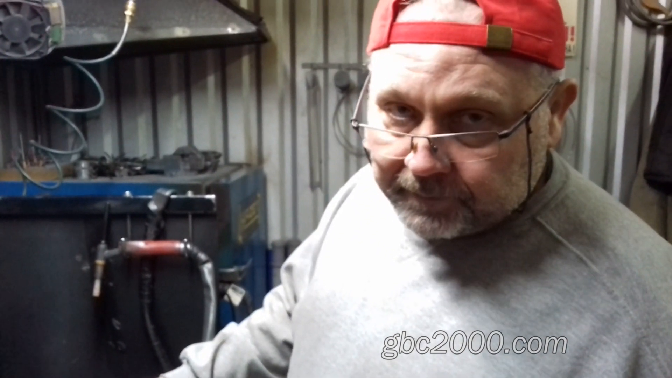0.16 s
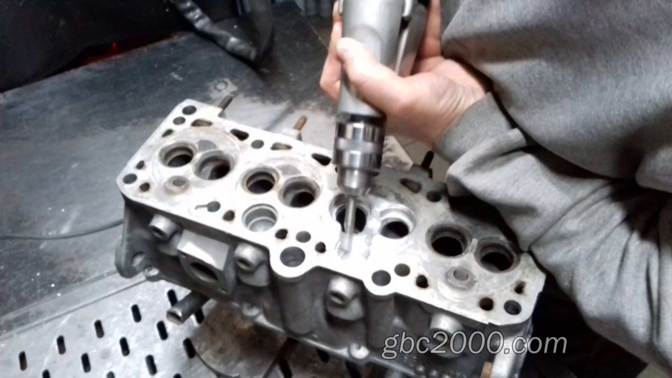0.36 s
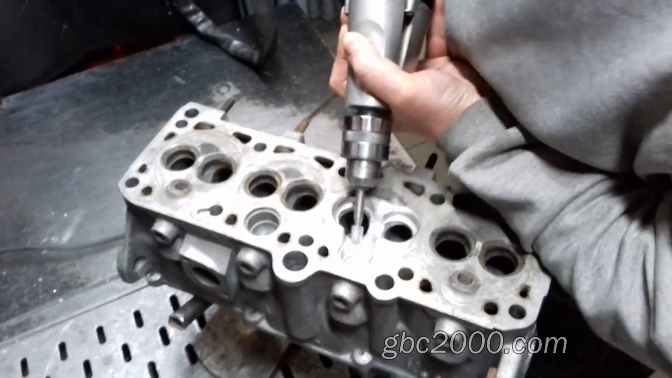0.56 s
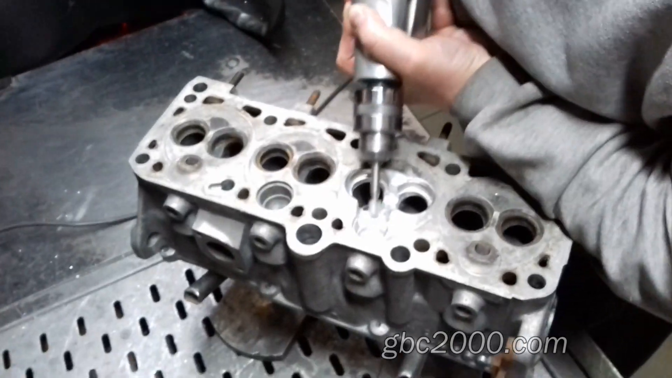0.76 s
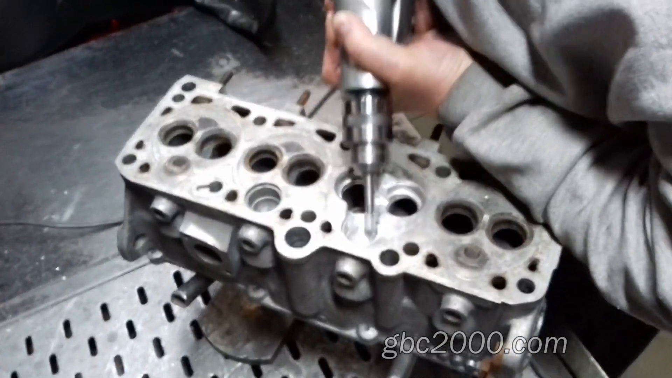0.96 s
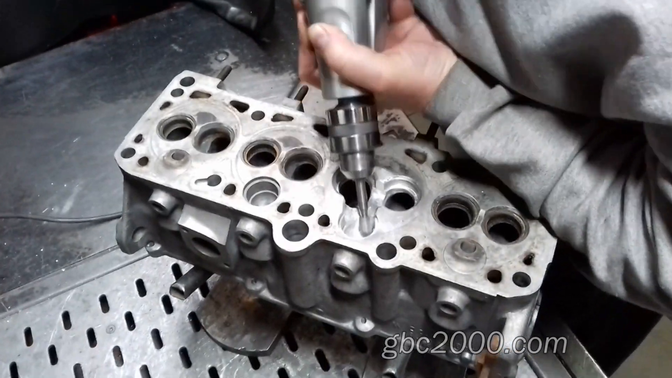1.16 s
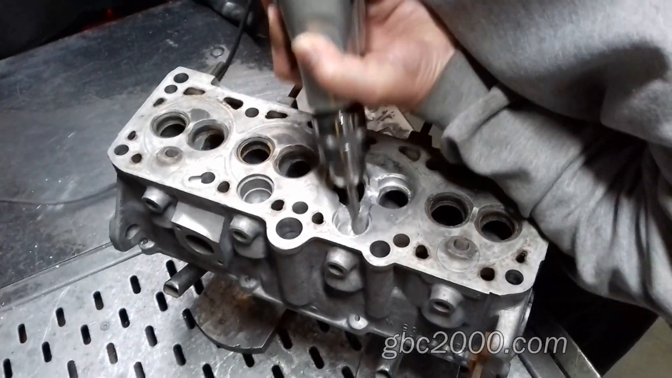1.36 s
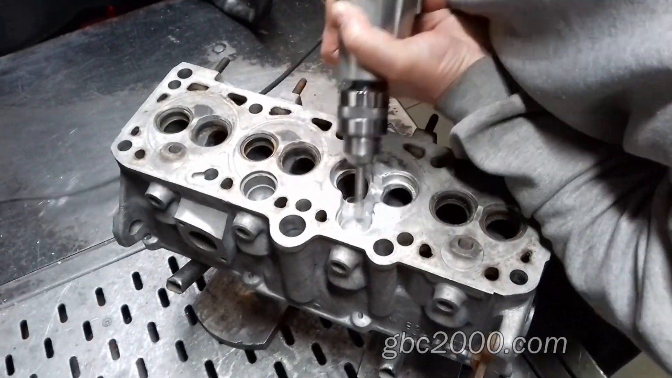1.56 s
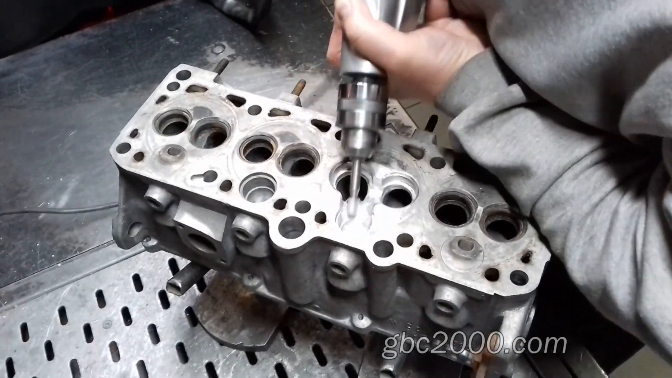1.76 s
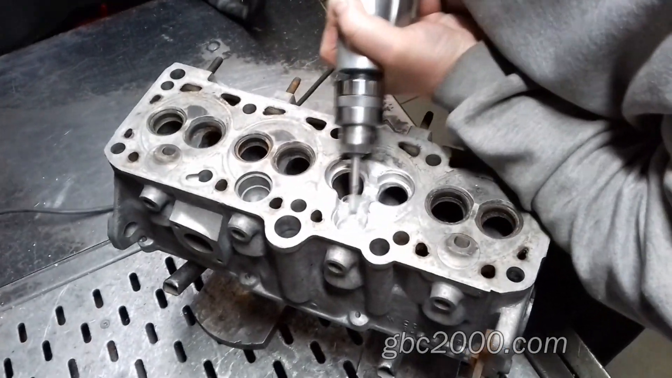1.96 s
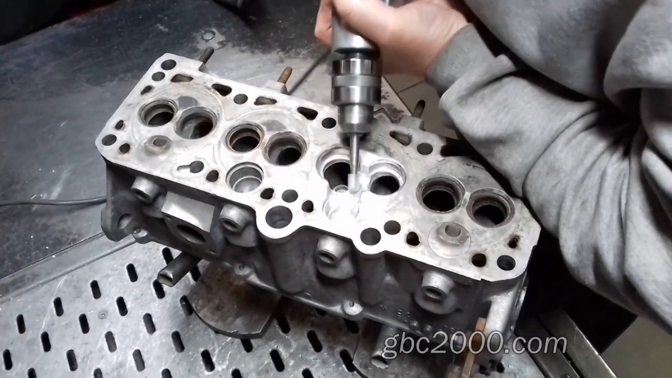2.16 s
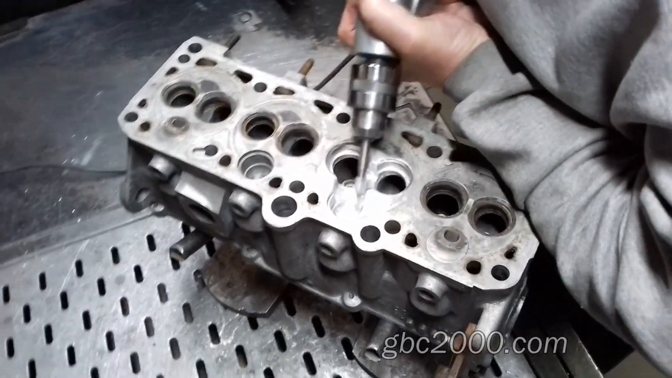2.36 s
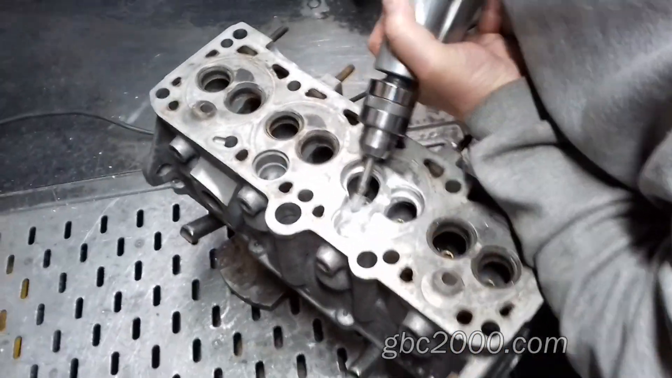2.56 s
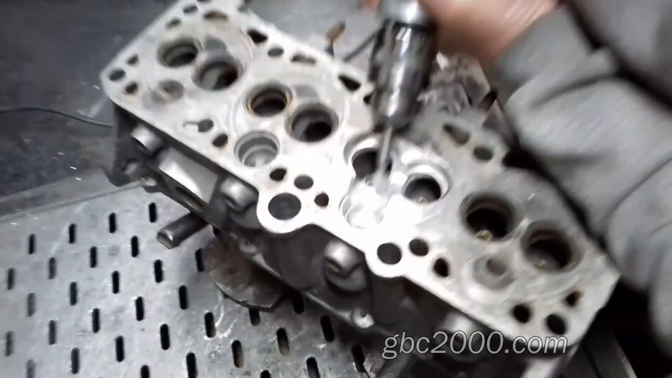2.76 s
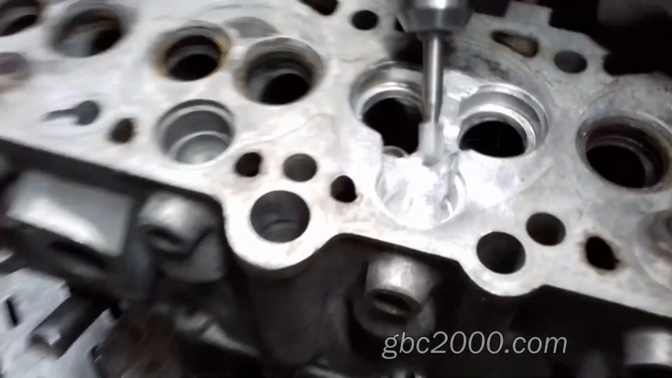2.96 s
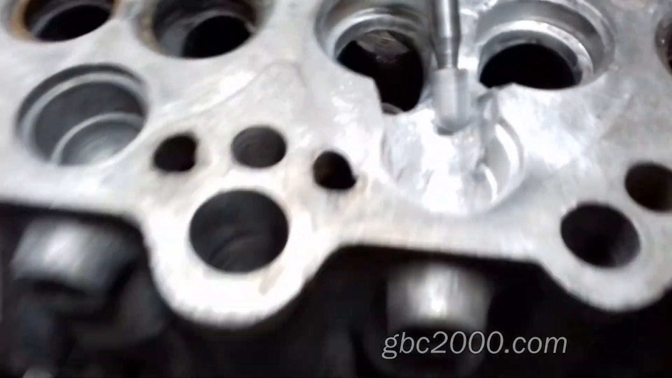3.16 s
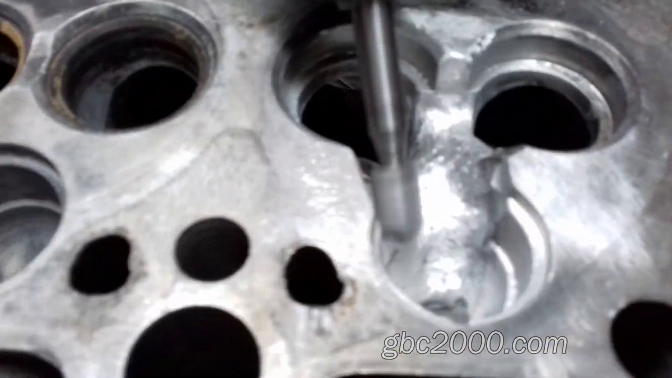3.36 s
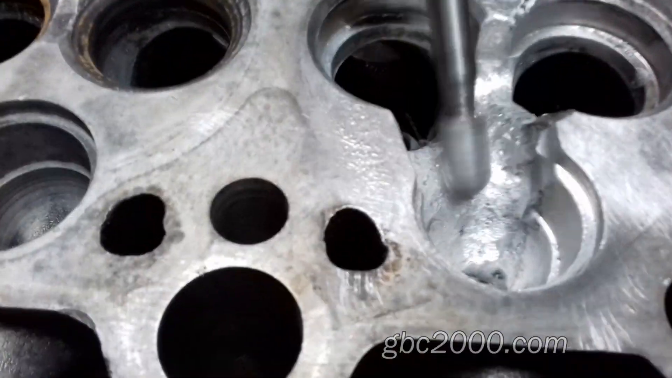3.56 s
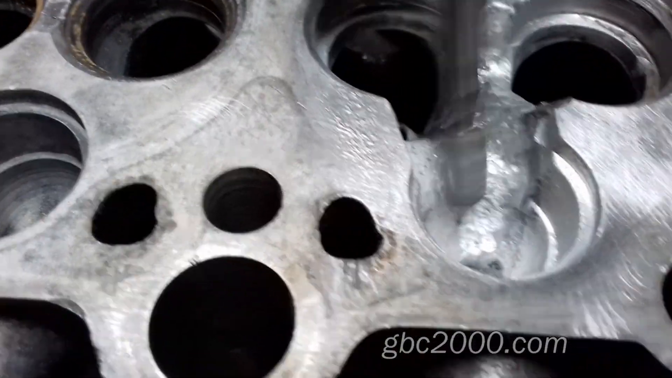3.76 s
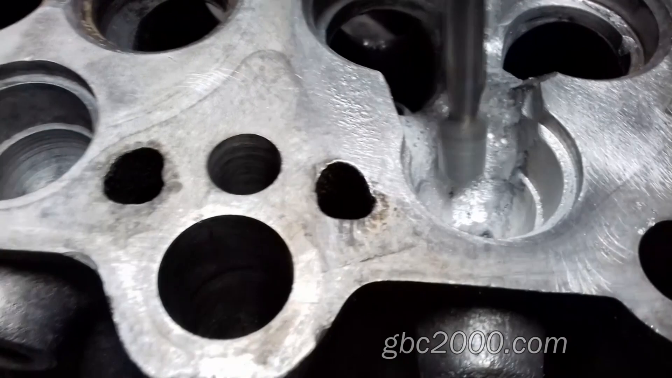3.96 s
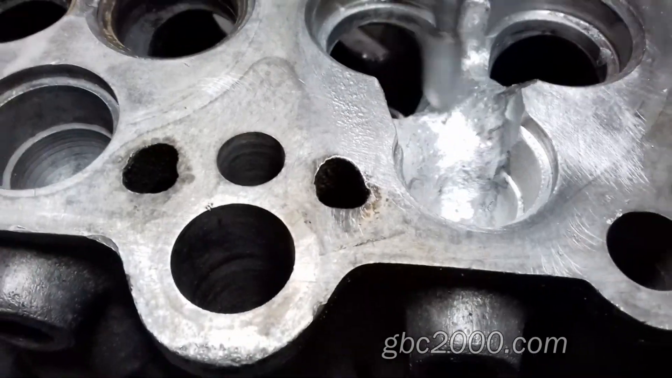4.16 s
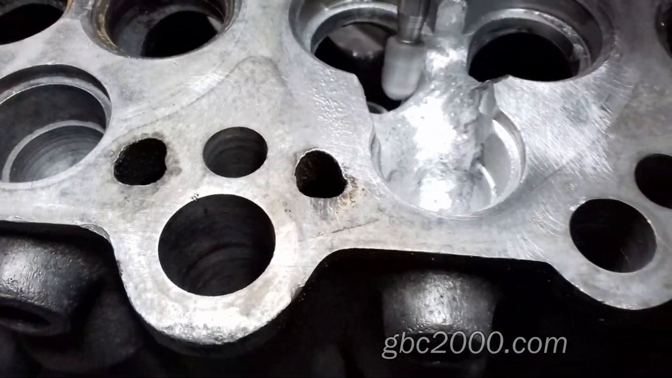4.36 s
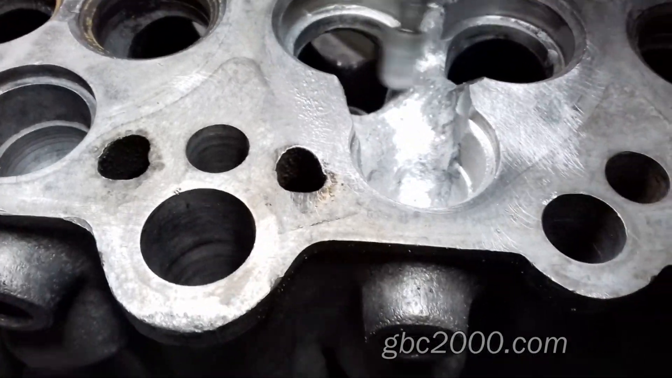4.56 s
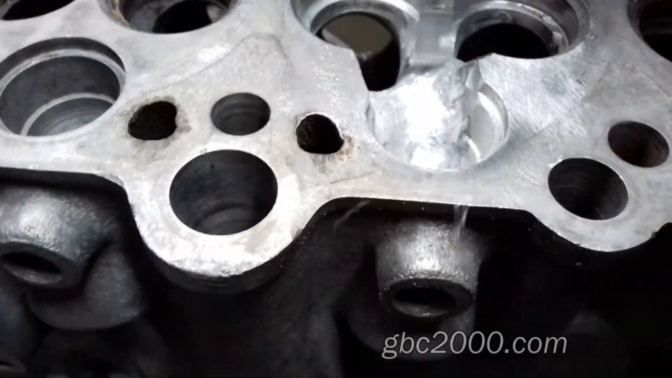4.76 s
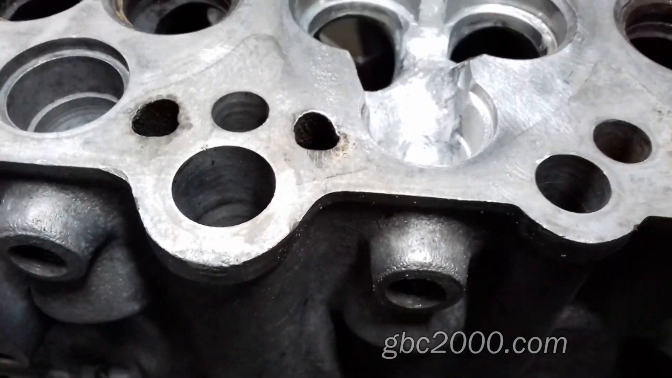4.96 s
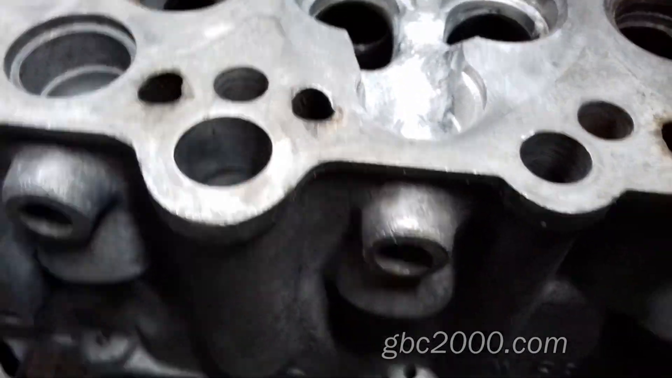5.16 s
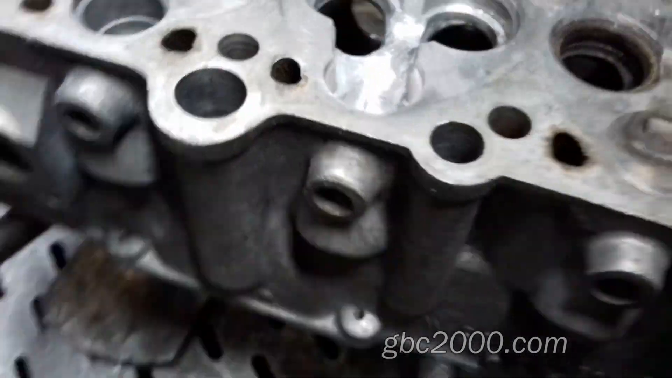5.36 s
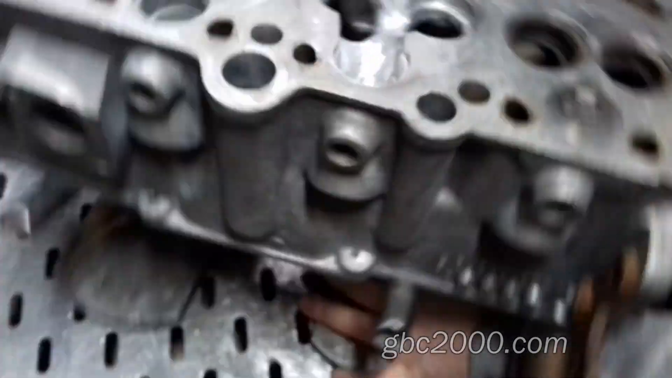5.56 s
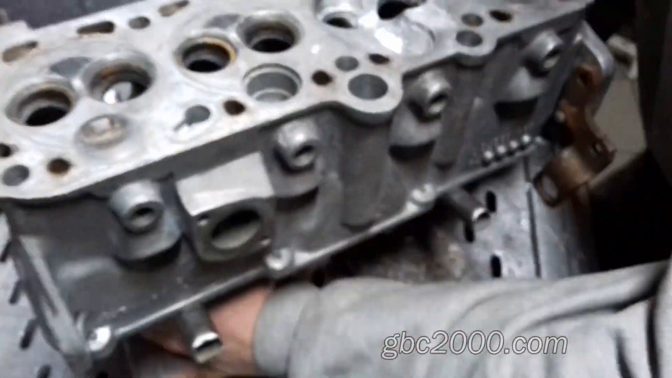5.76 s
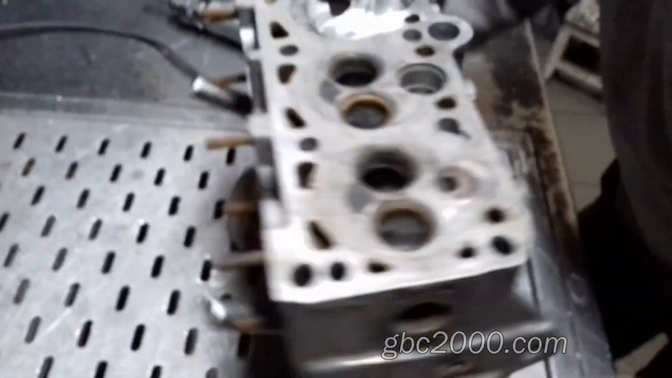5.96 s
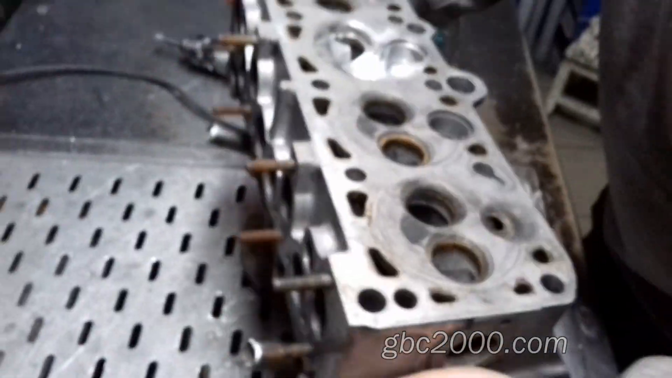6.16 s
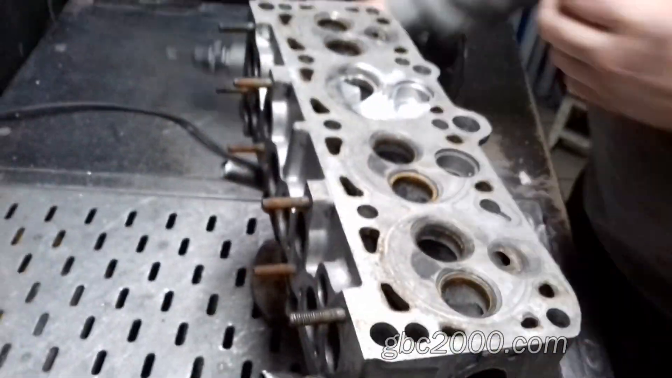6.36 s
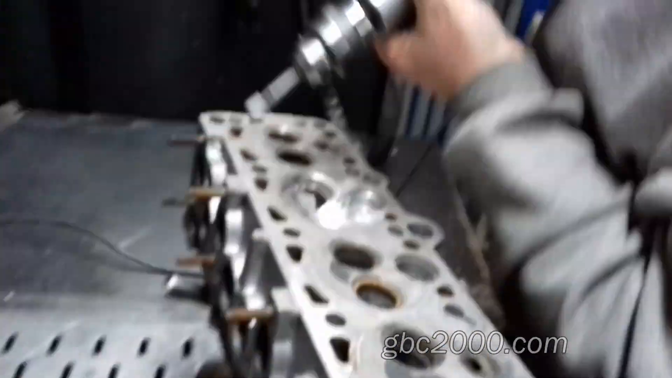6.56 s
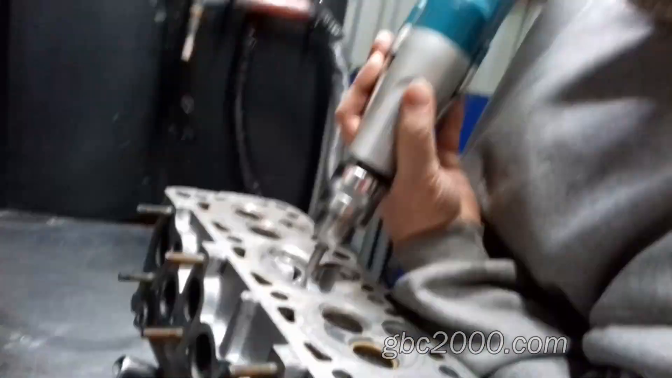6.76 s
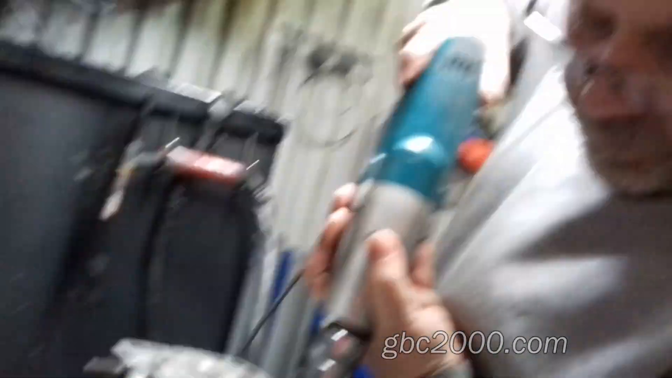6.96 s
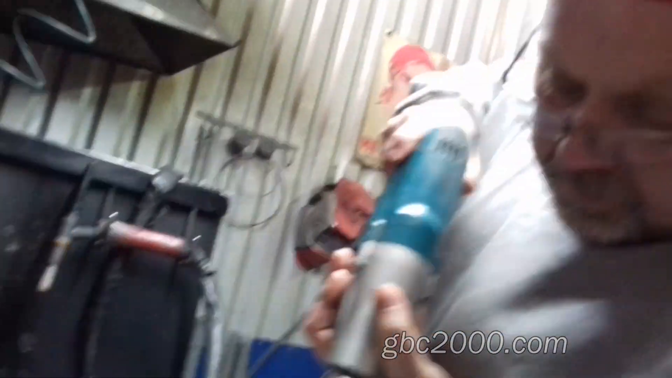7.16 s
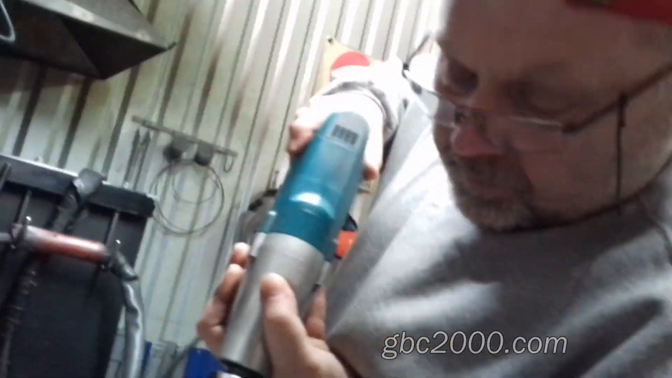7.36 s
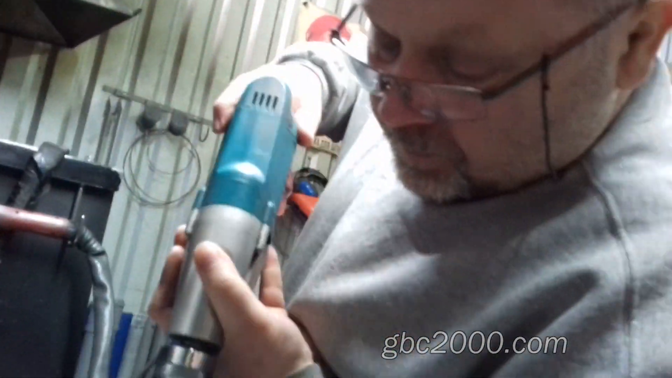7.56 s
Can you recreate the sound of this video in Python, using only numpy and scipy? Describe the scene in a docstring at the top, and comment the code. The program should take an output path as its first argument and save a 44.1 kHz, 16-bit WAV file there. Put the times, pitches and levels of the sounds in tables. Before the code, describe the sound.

A small high-speed grinder whines steadily, blasts air at the microphone, winds down as heavy metal scrapes and knocks, then restarts sharply.

```python
"""A workshop heard by one microphone. First comes a dull hum of the room, made of coloured noise; then the
scene changes. After a short silence a die grinder fades in: sine waves whine over the hiss of its fan, made of
noise. Its fan then blows air on the microphone, as fluttering low noise and single puffs. The grinder coasts
down while an aluminium casting slides over a steel bench and is set down: swelling noise, then cracks with
ringing tones. At last a switch clicks and the grinder spins up again."""
import sys
import numpy as np
from scipy import signal
from scipy.fft import rfft, irfft, next_fast_len
from scipy.io import wavfile
from scipy.ndimage import uniform_filter1d

SR = 44100
rng = np.random.default_rng(int(sys.argv[2]) if len(sys.argv) > 2 else 0)


def materialize(psi):
    """Save the field psi as 16-bit PCM at rate SR to the path in sys.argv[1].

    A 1-D psi becomes a single channel; in a 2-D psi each row is a channel.
    """
    bounded = np.clip(np.atleast_2d(psi).T, -1, 1)
    quanta = np.round(bounded * 32767).astype(np.int16)
    wavfile.write(sys.argv[1], SR, quanta)


N = 336042

FAST = next_fast_len(N)  # a length that makes the Fourier transform quick
T = np.arange(N) / SR  # time, s
HZ = np.fft.rfftfreq(FAST, 1 / SR) + 1e-3  # frequencies of the transform, kept above 0 for the logarithm
TOP_HZ = 15830  # upper limit of the sound
OFF_S, ON_S = 4.96, 6.828  # the grinder is switched off and on
FREE_HZ = 1597  # pitch of the whine without load


def undb(db):
    """Turn dB into a gain."""
    return 10 ** (np.asarray(db) / 20)


def unit(x):
    """Scale to an rms level of 1."""
    return x / np.sqrt(np.mean(x ** 2))


def curves(rows):
    """Join each column of a table by straight lines in time; the first column holds seconds."""
    s, *columns = np.transpose(rows)
    return [np.interp(T, s, column) for column in columns]


def colour(x, gain):
    """Filter x by a gain over frequency."""
    return irfft(rfft(x, FAST) * gain, FAST)[:N]


def shape(points, humps=(), hump_db=0):
    """Gain over frequency: lines through (Hz, dB) points, raised by humps (Hz, width in Hz, dB)."""
    hz, db = np.transpose(points)
    lift = 1 + sum(undb(peak_db + hump_db) / (1 + (2 * (HZ - centre) / width) ** 2)
                   for centre, width, peak_db in humps)
    return lift * undb(np.interp(np.log(HZ), np.log(hz), db))


def walk(rate):
    """Random wandering: values held for 1 / rate seconds, smoothed twice and scaled to rms 1."""
    hold = int(SR / rate)
    steps = np.repeat(rng.standard_normal(N // hold + 1), hold)
    smooth = uniform_filter1d(uniform_filter1d(steps, hold), hold)
    return unit(smooth[:N])


def room(x, wet_db):
    """Add the dense, dying echo of sheet-metal walls to the direct sound."""
    t60_s = .3  # time to fade by 60 dB
    t = np.arange(SR // 2) / SR
    tail = rng.standard_normal(len(t)) * np.exp(-np.log(1000) * t / t60_s) * (t > .004)
    tail *= undb(wet_db) / np.sqrt(np.sum(tail ** 2))
    tail[0] = 1  # the direct sound
    return signal.fftconvolve(x, tail)[:N]


def stances():
    """Share of each place of the microphone over time, with soft changes between places."""
    # Times in seconds that bound the places: afar, close up, sliding casting, motor at rest, beside the vents.
    edges_s = [0, 2.95, 5.45, 6.3, 6.83, 9]
    turn_s = .1
    return [np.clip(np.minimum(T - start, end - T) / turn_s + .5, 0, 1)
            for start, end in zip(edges_s, edges_s[1:])]


def speed():
    """Pitch of the whine: under load, then slowed by friction and fan drag, then spinning up."""
    # The whine under the changing load of the brush. Each row: time in seconds, pitch in Hz.
    load_rows = [(0.66, 1589), (1.84, 1604), (2.34, 1614), (3.07, 1620), (3.3, 1612), (4.09, 1601),
                 (4.29, 1626), (4.84, 1606), (4.95, 1604)]
    friction_hz_per_s, drag_per_hz_s = 640, 5e-4  # a constant loss, and one that grows with speed squared
    spinup_s, spinup_power = .039, .57
    run, = curves(load_rows)
    knee = np.sqrt(friction_hz_per_s / drag_per_hz_s)  # pitch in Hz where both losses are equal
    # a loss of constant plus square makes the speed follow a tangent
    angle = np.arctan(run / knee) - np.maximum(T - OFF_S, 0) * knee * drag_per_hz_s
    coast = knee * np.tan(np.maximum(angle, 1e-3))
    missing = np.exp(-(np.maximum(T - ON_S, 0) / spinup_s) ** spinup_power)
    return np.where(T < ON_S, coast, FREE_HZ * (1.001 - missing))


def motor():
    """The whine is sines at multiples of one pitch; the commutator adds a blurred buzz at low speed."""
    # The whine as the tool turns in the hand.
    # Each row: time in seconds, level in dB of multiples 1, 2 and 3 at the pitch without load.
    whine_rows = [(.64, -41.5, -27.5, -45), (1.0, -42.5, -31.5, -37), (1.56, -37.5, -30.5, -39),
                  (2.1, -39, -38.5, -48), (2.5, -37, -42, -35.5), (2.84, -39, -31.5, -33.5),
                  (3.1, -33.5, -44, -36), (3.9, -34, -40, -37), (4.3, -32.5, -64, -41),
                  (4.95, -34.5, -43, -36), (5.15, -40, -42, -45), (5.3, -34.5, -30, -45),
                  (5.45, -36, -33, -44), (5.57, -29.5, -39, -42), (5.72, -43, -40, -44),
                  (5.9, -35, -41, -45), (6.87, -38, -46, -36), (7.05, -34.5, -40, -47),
                  (7.62, -41.5, -50, -47)]
    # Higher multiples of the whine. Each row: multiple, level in dB relative to multiple 2.
    upper_rows = [(4, -10), (7, -13), (8, -14)]
    # Level of the buzz before the housing shapes it. Each row: time in seconds, level in dB.
    buzz_rows = [(5.32, -39), (5.5, -54), (5.65, -57), (5.85, -47), (6.0, -49), (6.11, -44), (6.3, -50),
                 (6.42, -75), (6.826, -75), (6.845, -22)]
    # How the housing passes on the buzz. Each row: frequency in Hz, gain in dB.
    housing_rows = [(2000, -26), (5000, 0), (7000, 0), (8700, 2), (10700, -6), (13000, 2), (15800, -4)]
    db_per_octave = 18  # a slower whine is quieter
    bars = 12  # commutator bars passing the brushes per period of the whine
    hz = speed()
    turn = 2 * np.pi * np.cumsum(hz) / SR
    low_db = curves(whine_rows) + db_per_octave * np.log2(hz / FREE_HZ)
    out = np.zeros(N)
    for k, (db, wobble_db) in enumerate(zip(low_db, (.8, 1.1, 2.5)), start=1):
        out += undb(db + wobble_db * walk(40)) * np.sin(k * turn)
    for k, db in upper_rows:
        out += undb(low_db[1] + db + 3.4 * walk(6.9)) * np.sin(k * turn + 1.0 * walk(40))
    buzz_db, = curves(buzz_rows)
    housing_hz, housing_db = np.transpose(housing_rows)
    for k in range(1, 6):
        buzz_hz = k * bars * hz
        housing = undb(np.interp(np.log(buzz_hz), np.log(housing_hz), housing_db))
        heard = (buzz_hz < TOP_HZ) * housing
        level = undb(buzz_db - 2.5 * (k - 1) + 1.5 * walk(25))
        out += heard * level * np.sin(k * bars * turn + 1.1 * walk(170))
    return np.sqrt(2) * out  # so that the levels are rms


def hiss():
    """Gritty noise from fan, brushes and bristles, coloured by place; the sliding casting swells in it too."""
    # The hiss as the tool moves.
    # Each row: time in seconds, level in dB, extra dB at 7-11 kHz, extra dB at 11-16 kHz.
    hiss_rows = [(.64, -24.5, 0, -2), (1.3, -25, 0.5, 0.5), (1.9, -25, -1, 0.5), (2.4, -24, 2, -1),
                 (2.85, -24.5, 4, -4.5), (3.06, -26, 2, 0), (3.5, -25, -3.5, -0.5), (4.1, -28, 1, 2.5),
                 (4.3, -26.5, 3.5, -6), (4.93, -28.5, 3.5, -5), (5.15, -29.5, -2.5, 4),
                 (5.27, -29.5, -2.5, 1), (5.39, -27.5, -12, 2), (5.56, -45, -6, 3), (5.78, -46.5, -7, -2),
                 (6.3, -47, 1, 1), (6.5, -49, -3, 2), (6.83, -48.5, -2, -1), (6.85, -32.5, 9, -4),
                 (6.918, -25.5, 1, -10), (7.02, -29, -3, 1), (7.15, -30, 0.5, 2), (7.62, -28.5, -0.5, -0.5)]
    # The casting slid over the bench. Each row: time of the loudest moment in seconds, level in dB,
    # swell in dB per second, fade in dB per second, extra dB above 7 kHz.
    slide_rows = [(5.7, -49, 144.5, 150, 10), (5.85, -45, 200, 66, -9), (5.99, -34, 68, 196, 3),
                  (6.177, -28.5, 500, 400, -7), (6.248, -42, 600, 500, -4)]
    # Level of the sliding in dB, one value for each band.
    slide_bands_db = (-0.5, -9.5, -2, -20, 0)
    # Frequency bands. Each row: lower edge in Hz, upper edge in Hz.
    bands_hz = [(3300, 7000), (800, 1500), (1500, 3300), (7000, 11000), (11000, 16000)]
    # One row for each of the five places of the microphone: level in dB of each band.
    balance_db = [(0, -31, -5.5, -4.5, -2), (0, -20.5, -5.5, 0, -3), (0, -8, 4, -2, 0),
                  (0, -6, 0, 0.5, -0.5), (0, -23, -6.5, 1.5, 6.5)]
    # Colour of the hiss from afar, close up, sliding and beside the vents. Each row: frequency in Hz, dB per Hz.
    tool_colours = [
        [(290, -69), (500, -32), (805, -11.5), (986, -8), (1480, -20.5), (1570, -18), (1760, -18), (3130, -7.5),
         (3470, -11.5), (5350, -2), (9120, 0), (12700, 2.5), (15800, 6)],
        [(290, -62), (500, -29), (1040, -22), (1440, -20), (1570, -18.5), (1710, -18), (2030, -12), (2600, -9),
         (3270, -12.5), (4690, -1), (6740, -4.5), (12500, 6.5), (15800, 3)],
        [(290, -42), (500, 3), (841, 1), (1520, -8.5), (1810, -6), (1940, -4), (2450, -6.5), (2830, -8),
         (3730, -1.5), (4560, 1.5), (5750, 5.5), (12900, -2.5), (15800, -5)],
        [(290, -59), (500, -32), (749, -24), (1210, -25.5), (1540, -19), (1680, -18), (2310, -6.5),
         (2870, -11.5), (5350, -7.5), (6740, -8.5), (9950, -6.5), (12700, 1.5), (15800, -6.5)],
    ]
    # Humps on those four colours, before all are lowered by 3.5 dB. Each row: centre in Hz, width in Hz, dB.
    tool_humps = [
        [(4100, 630, 3.5), (5360, 470, -0.5), (6490, 120, -1.5), (11200, 200, -9), (13000, 1300, 6.5)],
        [(2600, 37, -4), (3220, 19, -13), (3720, 64, -3), (4900, 57, -11), (6430, 53, 4), (8060, 68, -5),
         (13100, 1210, -4)],
        [(2490, 110, 5), (3160, 50, 7), (3750, 210, 2), (5740, 690, -12), (8190, 260, -9), (8470, 83, -5),
         (9400, 80, -21)],
        [(4230, 184, -13), (5400, 96, -5), (6340, 68, -8), (8460, 140, -11), (9520, 140, -8), (10530, 70, 4),
         (12600, 390, -12)],
    ]
    # Colour of the hiss left with the motor at rest. Each row: frequency in Hz, dB per Hz.
    rest_colour = [(290, -46), (500, -16), (639, -3), (707, -10), (1010, -2), (1660, -14), (1810, -4),
                   (3950, -8.5), (5420, 1), (13100, -15), (15800, -18)]
    main_db, *treble_db = curves(hiss_rows)
    slides = []
    for s, db, swell, fade, top_db in slide_rows:
        below_peak_db = np.where(T < s, swell * (s - T), fade * (T - s))
        slides.append((undb(db - below_peak_db), top_db))
    grit = room(rng.standard_normal(N) * undb(0.74 * walk(1500)), -12)
    place_colours = tool_colours[:3] + [rest_colour] + tool_colours[3:]
    place_humps = tool_humps[:3] + [[]] + tool_humps[3:]
    gains = [shape(points, humps, -3.5) for points, humps in zip(place_colours, place_humps)]
    shares = stances()
    whole = sum(share * colour(grit, gain) for share, gain in zip(shares, gains))
    out, shared = np.zeros(N), walk(9)
    for k, ((lo, hi), extra_db) in enumerate(zip(bands_hz, [0, 0, 0] + treble_db)):
        # soft edges, so neighbouring bands overlap at half power
        edge = np.sqrt(1 / (1 + (lo / HZ) ** 12) / (1 + (HZ / hi) ** 12))
        rms = sum(share * np.sqrt(np.mean((gain * edge) ** 2)) for share, gain in zip(shares, gains))
        place_db = sum(share * row[k] for share, row in zip(shares, balance_db))
        tool = undb(main_db + extra_db + place_db)
        slide_power = sum((swelling * undb(slide_bands_db[k] + top_db * (k > 2))) ** 2
                          for swelling, top_db in slides)
        level = np.sqrt(tool ** 2 + slide_power)
        flicker = undb(.6 * shared + .7 * walk(14))
        out += unit(colour(whole, edge) / rms) * level * flicker
    return out


def sheen():
    """A bright band of hiss whose centre slides as the microphone moves close to the casting."""
    # Each row: time in seconds, centre in Hz, level in dB.
    sheen_rows = [(2.9, 11000, -32), (2.93, 11700, -32), (3.16, 10800, -26), (3.3, 11930, -27.5),
                  (4.11, 11800, -34), (4.33, 10560, -32), (4.54, 11100, -30), (5.01, 10620, -33),
                  (5.06, 11700, -39), (5.24, 11100, -32), (5.3, 12250, -36), (5.4, 11200, -34)]
    width_hz = 2200
    hz, db = curves(sheen_rows)
    # slow noise times a sine becomes a band of noise around the sine's pitch
    band = unit(colour(rng.standard_normal(N), np.exp(-(HZ / width_hz) ** 2 * 2)))
    close_up = stances()[1]
    return np.sqrt(2) * close_up * undb(db) * band * np.sin(2 * np.pi * np.cumsum(hz) / SR)


def draught():
    """Eddies of fan air thump the microphone in a dense flutter, brighter when strong, with single puffs."""
    # Stream of air, before the final high-pass. Each row: time in seconds, level in dB.
    stream_rows = [(3.15, -70), (3.28, -53.5), (3.38, -40.5), (3.5, -37), (3.64, -38), (3.76, -31),
                   (3.9, -25.5), (4.07, -25.5), (4.19, -37), (4.25, -51), (4.35, -85)]
    # Single puffs, before the final high-pass. Each row: start in seconds, peak in dB.
    puff_rows = [(3.475, -19), (3.58, -32), (3.74, -20), (3.799, -11), (3.871, -11), (3.878, -18),
                 (3.928, -18), (3.992, -13), (4.027, -16), (4.045, -14), (4.089, -22), (4.209, -34),
                 (4.256, -15.5), (4.264, -18), (4.729, -43), (4.789, -31), (4.872, -32), (5.001, -22.5),
                 (5.02, -28), (5.059, -33), (5.185, -36)]
    # Colour of the moving air. Each row: frequency in Hz, dB per Hz.
    air_colour = [(30, -40), (90, -21), (150, -10.5), (280, 1), (600, -0.5), (1000, -6.5), (1500, -7.5),
                  (2200, -16), (3500, -38)]
    puff_t60_s, crest_db = 0.032, 9.5  # time to fade by 60 dB; peak above rms
    db, = curves(stream_rows)
    flutter = undb(4.5 * walk(400) + 1.5 * walk(80))
    wind = unit(colour(rng.standard_normal(N) * flutter, shape(air_colour)))
    dull = unit(signal.lfilter([.09], [1, -.91], wind))
    bright = np.clip((db + 39.5) / 14, 0, 1)
    stream = undb(db) * (bright * wind + (1 - bright) * dull)
    puff = sum((T > s) * undb(peak_db - crest_db - 60 * np.maximum(T - s, 0) / puff_t60_s)
               for s, peak_db in puff_rows)
    gust = colour(rng.standard_normal(N), shape(air_colour))
    gust /= np.sqrt(uniform_filter1d(gust ** 2, size=300))  # even out its loudness
    # the microphone port bleeds off the slowest pressure
    bleed = signal.butter(2, 110, "high", fs=SR, output="sos")
    return signal.sosfilt(bleed, stream + puff * gust)


def blows():
    """Each blow cracks as a burst of noise and rings the tones of bench and casting that lie near its spot."""
    # Blows on bench, casting and switch. Each row: start in seconds, crack level in dB, crack centre in Hz,
    # crack fade time (60 dB) in seconds, bench ring in dB, casting ring in dB, centre in Hz of the tones excited.
    hit_rows = [(5.3994, -15.5, 7000, 0.13, -25.5, -62, 2537), (5.899, -51, 900, .2, -49, -62, 900),
                (6.158, -39, 4000, 0.14, -34, -60, 796), (6.179, -30, 900, 0.21, -24.5, -60, 840),
                (6.247, -44, 900, .15, -38, -60, 900), (6.4086, -16, 3800, 0.11, -32, -24.5, 1480),
                (6.61, -32, 9000, .05, -60, -60, 6000), (6.811, -28.5, 8000, 0.09, -60, -37, 6000),
                (6.831, -18.5, 8960, 0.092, -60, -45, 6000)]
    # Ringing tones of the bench. Each row: frequency in Hz, level in dB, time to fade by 60 dB in seconds.
    bench_modes = [(430, -3.5, 0.42), (570, -2, 0.13), (766, -7, 0.2), (880, -5, 0.28), (994, -4, 0.14),
                   (1226, -7, 0.18), (1434, -5, 0.13), (2205, -7, 0.19), (2560, 2, 0.083), (3100, -7, .12),
                   (5200, 2, .1)]
    # Ringing tones of the casting. Each row: frequency in Hz, level in dB, time to fade by 60 dB in seconds.
    casting_modes = [(398, -1, .18), (554, -10, .3), (658, -6, .6), (1000, -8, .15), (1577, -2, .12),
                     (1850, 1, .12), (2067, 3, .12), (2632, -5, .12), (3327, -3, .1), (4215, -3, .09),
                     (5809, -3, .09), (7930, -4, .1)]
    rattle_hz, rattle_db, rattle_rad = 70, 2.5, .6  # loose contact makes every ring waver
    out, t = np.zeros(N), np.arange(SR // 2) / SR

    def waver():
        """Random values joined by lines."""
        return np.interp(t * rattle_hz, np.arange(64), rng.standard_normal(64))

    for s, crack_db, crack_hz, crack_t60, bench_db, casting_db, spot_hz in hit_rows:
        modes = [(hz, db + bench_db, t60) for hz, db, t60 in bench_modes]
        modes += [(hz, db + casting_db, t60) for hz, db, t60 in casting_modes]
        ring = np.zeros(len(t))
        for hz, db, t60 in modes:
            off_spot_db = 3.74 * np.log2(hz / spot_hz) ** 2
            level = undb(db - off_spot_db - 60 * t / t60 + rattle_db * waver())
            start_phase = 2 * np.pi * rng.random()
            ring += level * np.sin(2 * np.pi * hz * t + start_phase + rattle_rad * waver())
        edges_hz = [crack_hz / 3, min(3 * crack_hz, .45 * SR)]
        band = signal.butter(2, edges_hz, "band", fs=SR, output="sos")
        noise = unit(signal.sosfilt(band, rng.standard_normal(len(t))))
        crack = noise * undb(crack_db - 60 * t / max(crack_t60, .01))
        i = int(s * SR)
        out[i:i + len(t)] += crack + ring * np.minimum(t / 0.0016, 1)  # the ring builds up in 1.6 ms
    return room(out, -9.5)


def shop():
    """Room tone: a low rumble of room and bench, made of noise, and a few wavering hums, made of sines."""
    # Each row: time in seconds, level of the rumble in dB.
    rumble_rows = [(.64, -58.5), (2.8, -57.5), (4.4, -53), (5.3, -60.5), (5.8, -60), (6.42, -49.5),
                   (6.78, -57.5), (7.62, -54.5)]
    # Colour of the rumble with the motor running, then at rest. Each row: frequency in Hz, dB per Hz.
    rumble_colours = [
        [(15, -61), (25, -31), (54, -22), (81, -44), (140, -23), (210, -18), (315, -12.5), (438, -4), (479, -7),
         (533, -9), (687, -5.5), (719, -9), (900, -6.5), (1170, -19), (1980, -120)],
        [(15, -56), (25, -24), (27, -42), (60, -31), (102, -49), (213, -13.5), (259, -22), (389, -9.5),
         (525, -11), (900, -9.5), (1170, -26), (1980, -120)],
    ]
    # Steady hums. Each row: frequency in Hz, rms level in dB before it wavers.
    hum_rows = [(145, -79), (432, -67), (1852, -58), (5560, -64), (7962, -59), (10616, -61)]
    db, = curves(rumble_rows)
    noise = rng.standard_normal(N) * undb(2 * walk(12))
    rest = sum(stances()[2:4])  # from the sliding until the restart
    running, resting = (unit(colour(noise, shape(points))) for points in rumble_colours)
    out = ((1 - rest) * running + rest * resting) * undb(db)
    for hz, hum_db in hum_rows:
        level = np.sqrt(2) * undb(hum_db + 2.6 * walk(14))
        out += level * np.sin(2 * np.pi * hz * T + 1.75 * walk(25))
    return out


def opening():
    """The room's dull hum at the start: gritty noise with an echo, coloured with resonant humps."""
    # Colour of the hum. Each row: frequency in Hz, dB per Hz.
    hum_colour = [(18, -58), (30, -27), (90, -26), (145, -5.5), (244, -18.5), (353, -5), (459, -15),
                  (612, -6), (1120, -11.5), (1570, -10.5), (1840, -4.5), (3360, -10), (4490, -6.5),
                  (5680, -22.5), (7500, -41.5), (15800, -56)]
    # Resonant humps, before all are lowered by 2.5 dB. Each row: centre in Hz, width in Hz, dB.
    hum_humps = [(350, 38, -2), (617, 21, -2), (877, 52, 4), (1220, 40, -1.5), (1870, 280, -11),
                 (2520, 56, 6), (3600, 31, 5), (4470, 80, -12)]
    grit = rng.standard_normal(N) * undb(0.72 * walk(800) + .6 * walk(12))
    return unit(colour(room(grit, -10.0), shape(hum_colour, hum_humps, -2.5))) * undb(-30)


def scene():
    """The opening hum is cut to silence, then the workshop fades in; both channels are alike."""
    cut_s, fade_start_s, fade_end_s = .4328, .54, .645
    fade = np.clip((T - fade_start_s) / (fade_end_s - fade_start_s), 0, 1) ** 1.23
    workshop = motor() + hiss() + sheen() + draught() + blows() + shop()
    mono = (T < cut_s) * opening() + fade * workshop
    return np.array([mono, mono])


def record(dry):
    """The recorder cuts the top with a steep low-pass filter."""
    return signal.sosfilt(signal.ellip(10, .2, 80, TOP_HZ, fs=SR, output="sos"), dry)


dry = scene()
out = record(dry)
materialize(out)
```